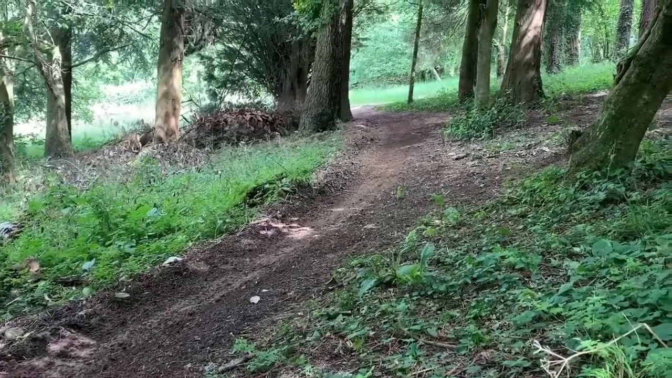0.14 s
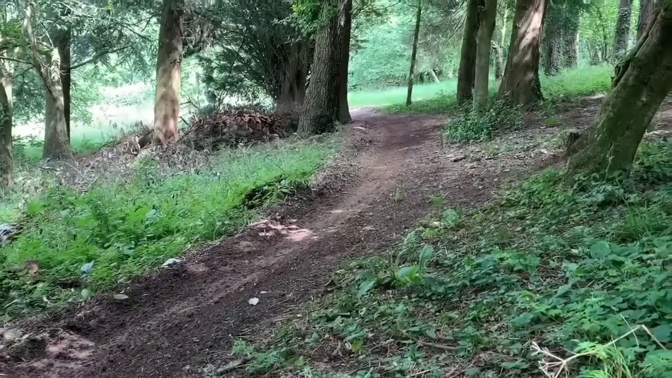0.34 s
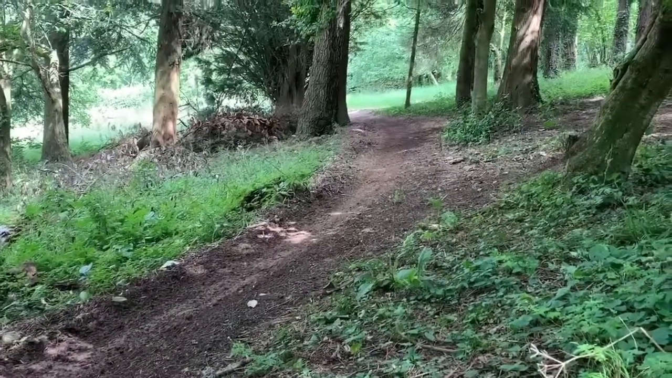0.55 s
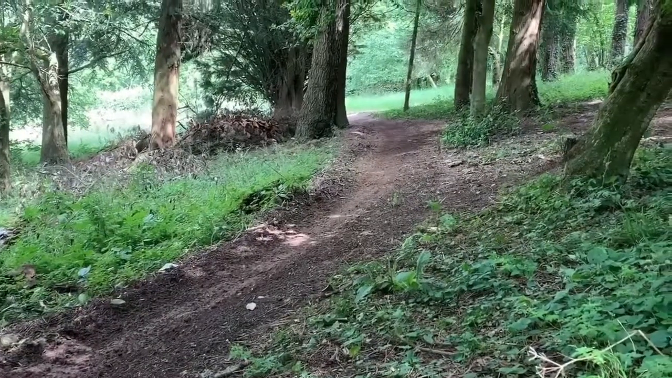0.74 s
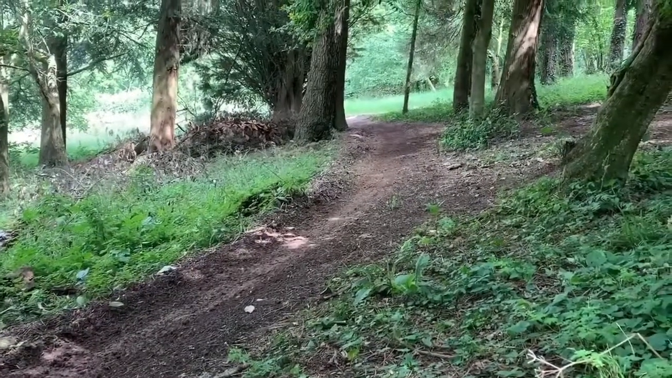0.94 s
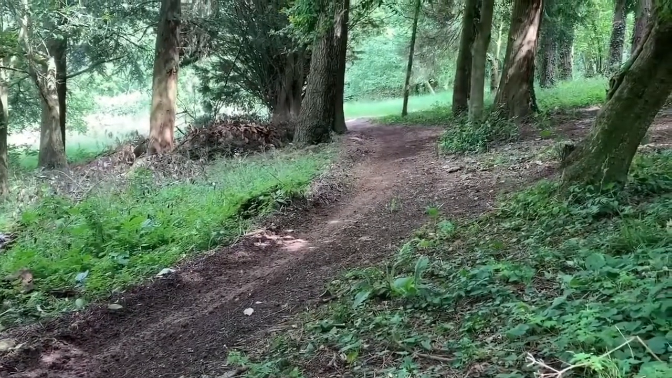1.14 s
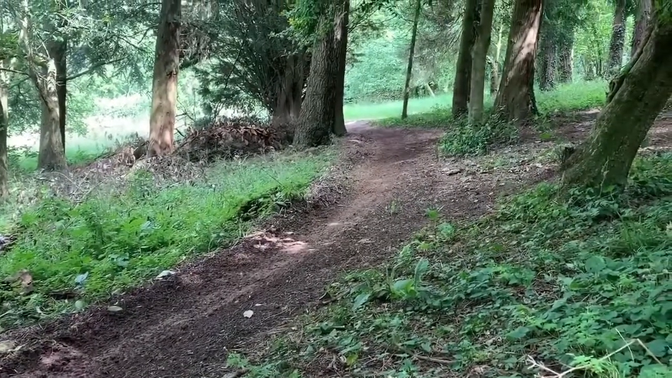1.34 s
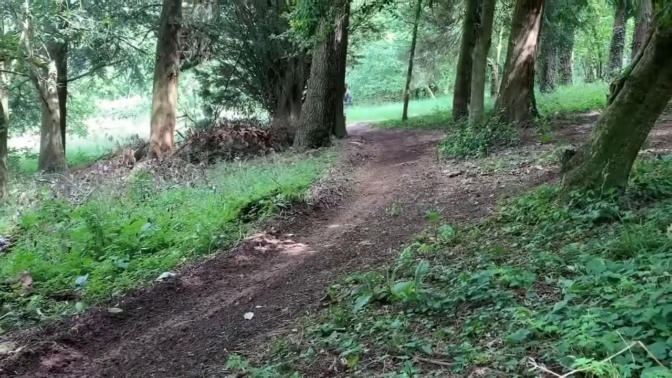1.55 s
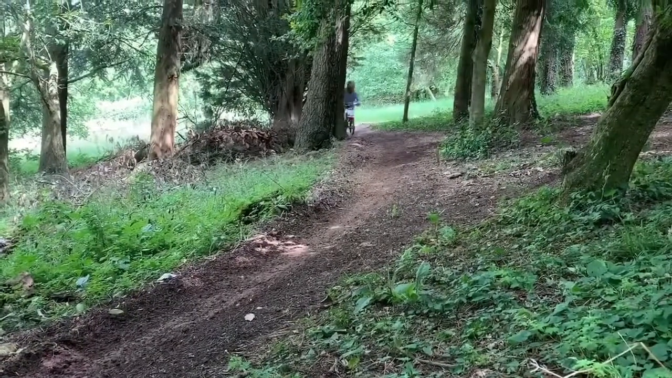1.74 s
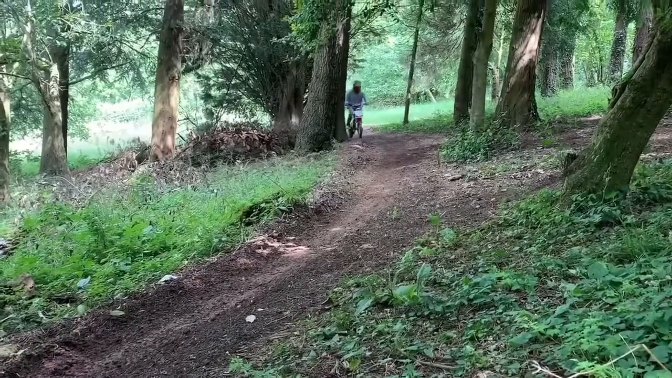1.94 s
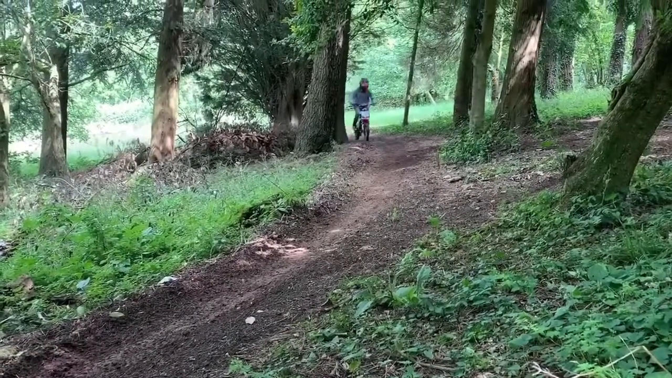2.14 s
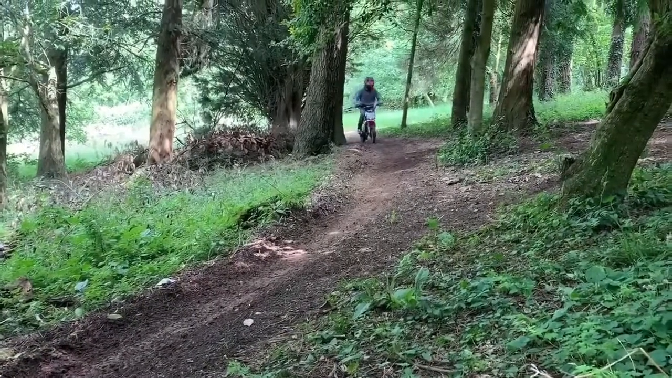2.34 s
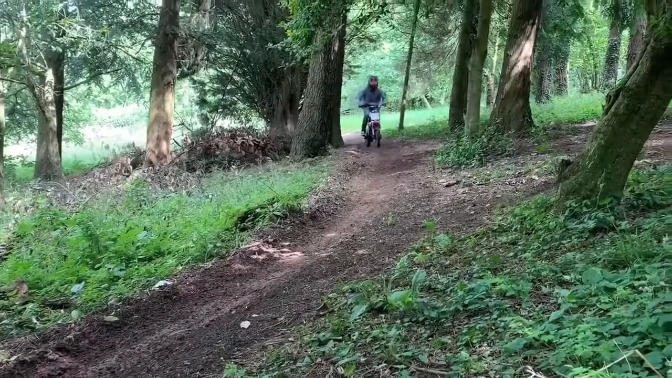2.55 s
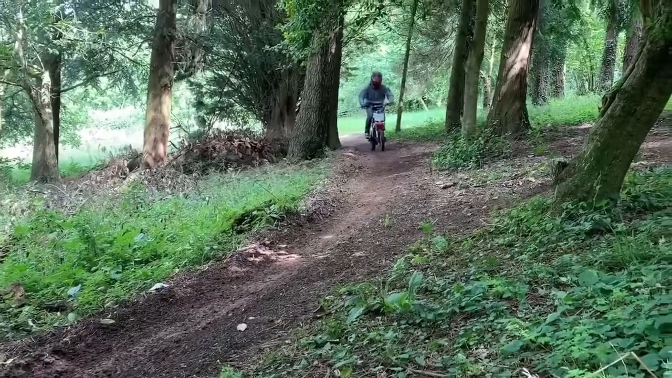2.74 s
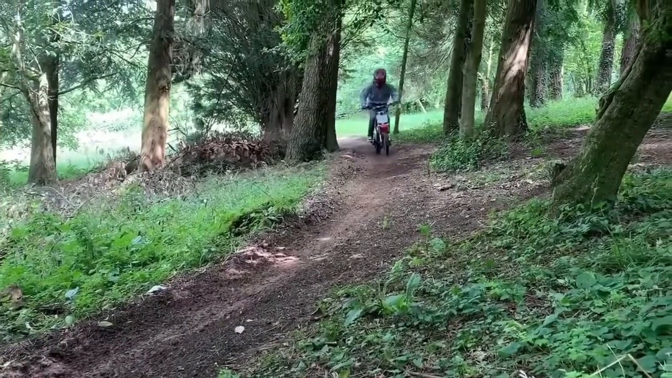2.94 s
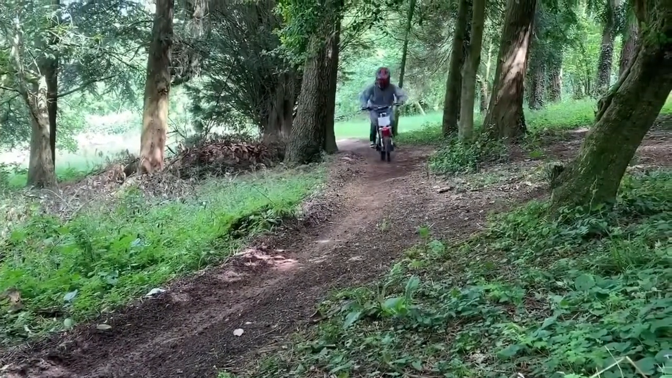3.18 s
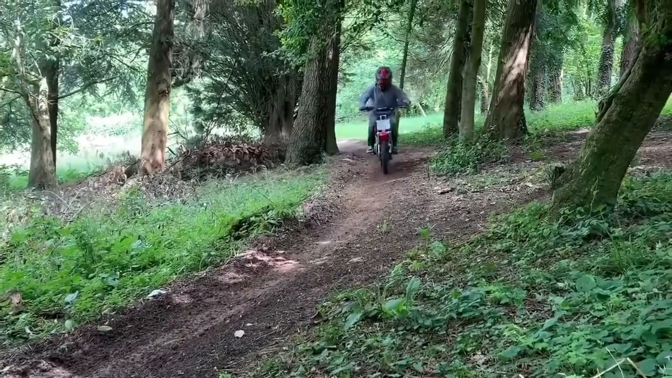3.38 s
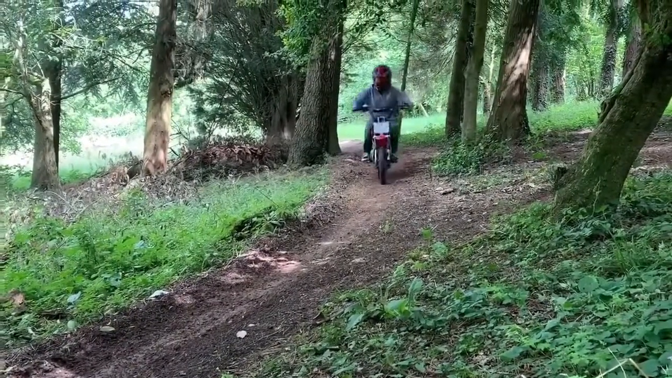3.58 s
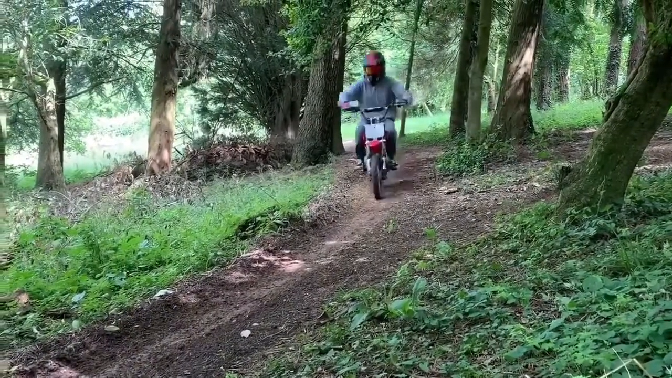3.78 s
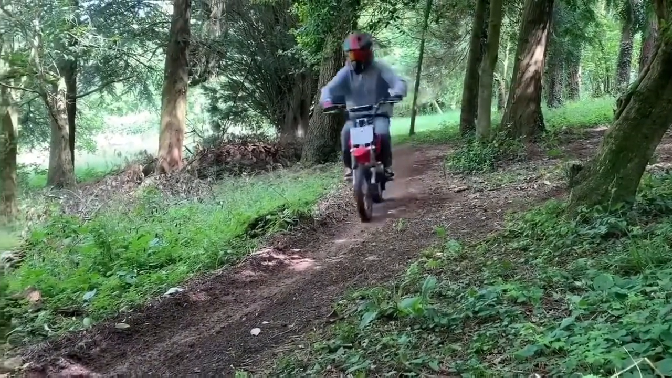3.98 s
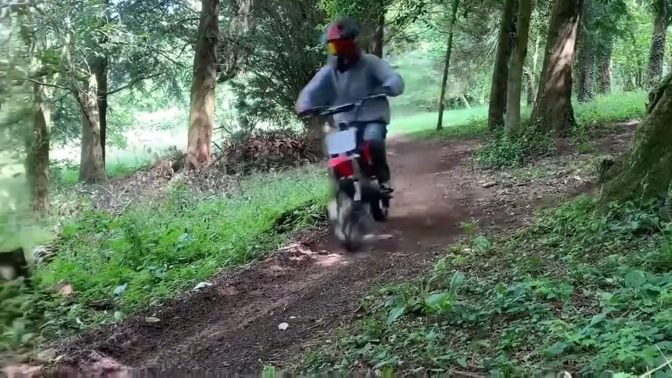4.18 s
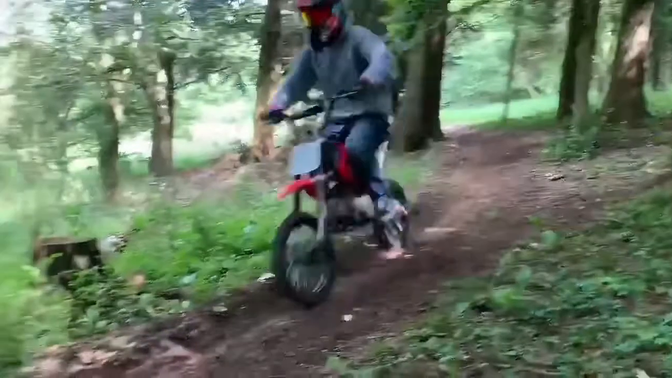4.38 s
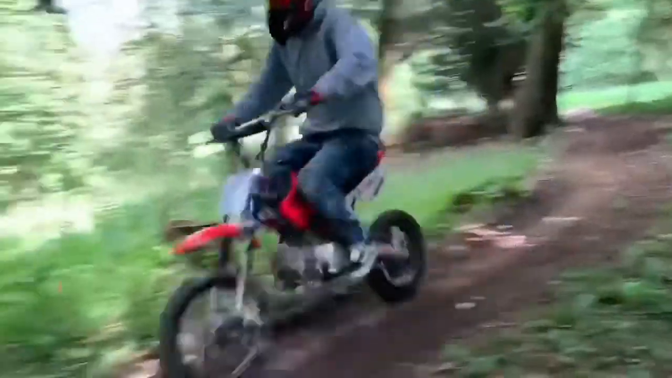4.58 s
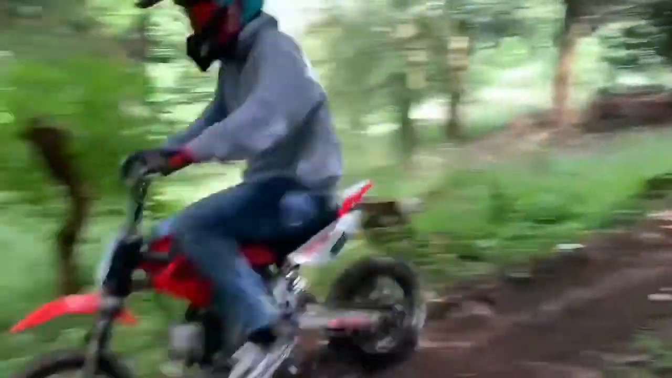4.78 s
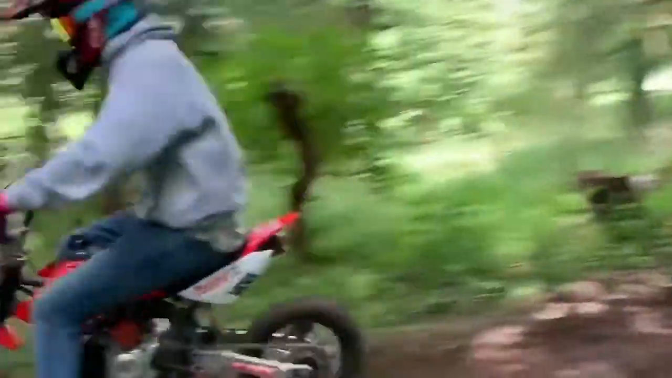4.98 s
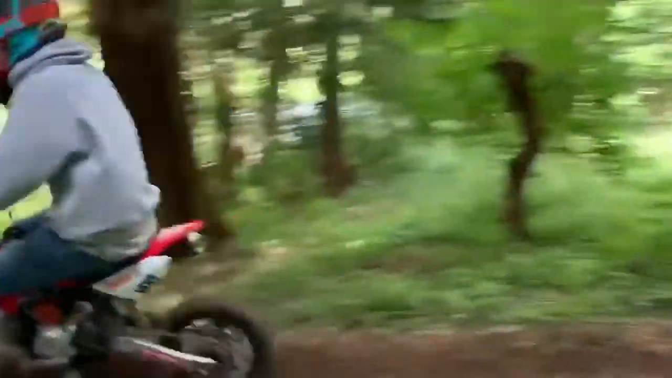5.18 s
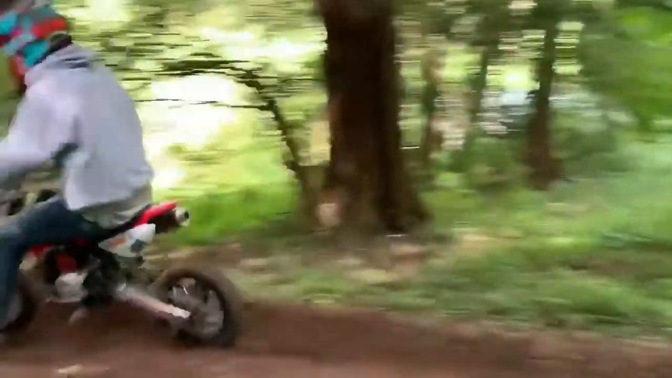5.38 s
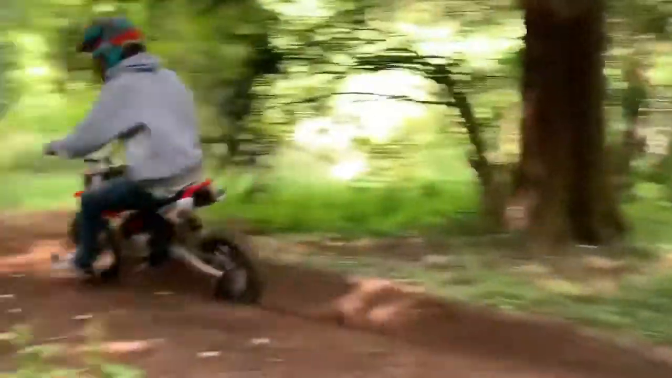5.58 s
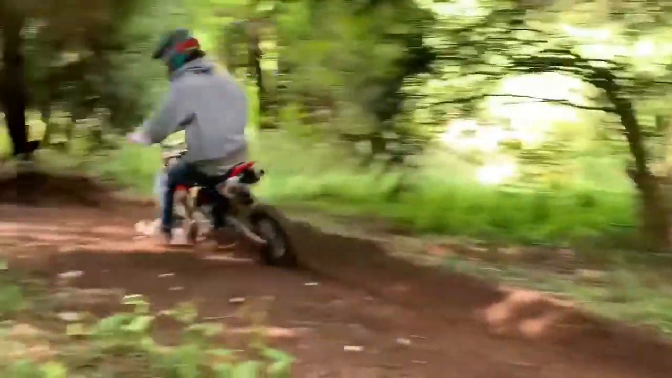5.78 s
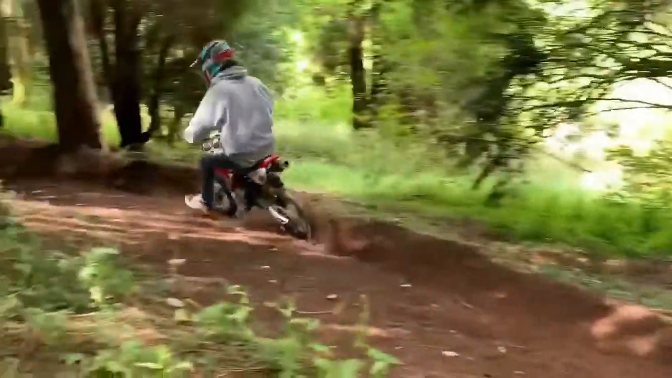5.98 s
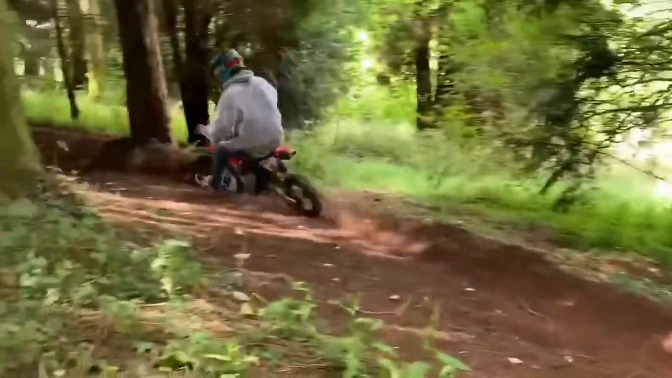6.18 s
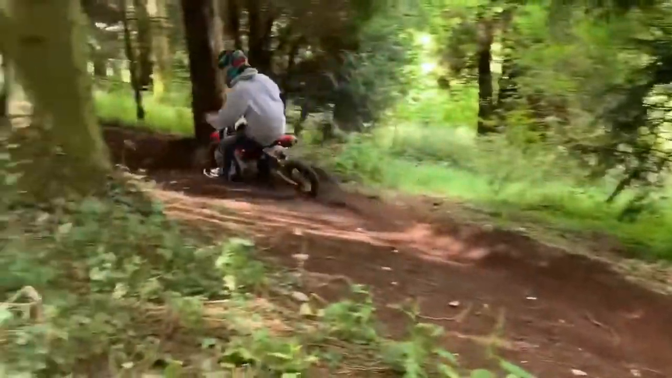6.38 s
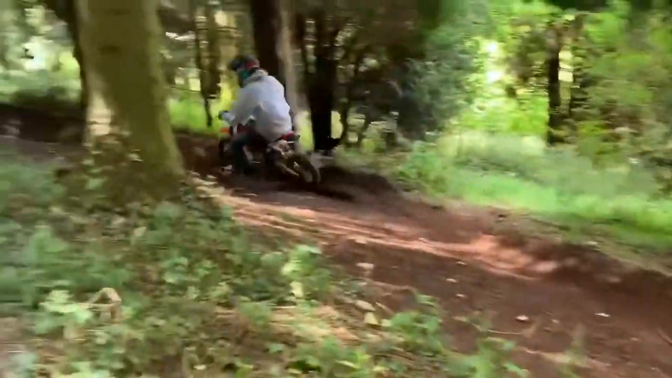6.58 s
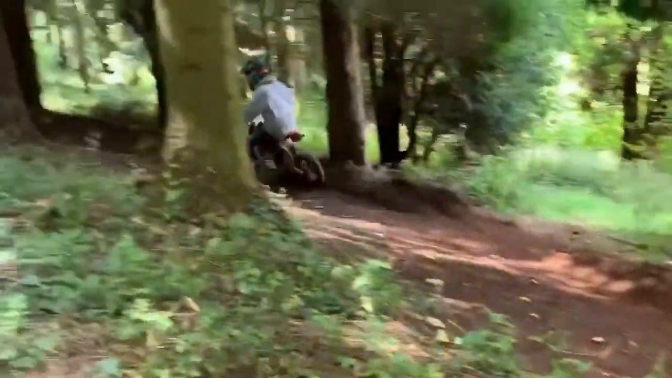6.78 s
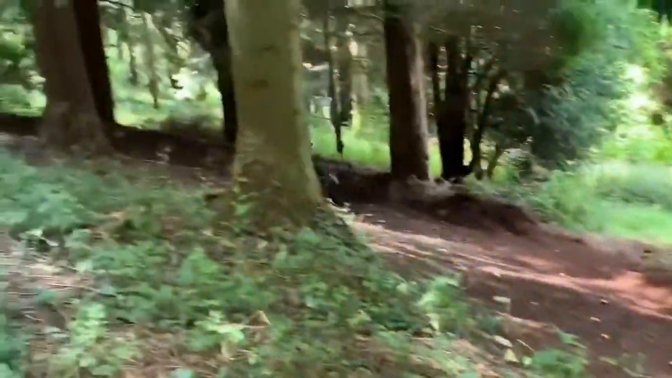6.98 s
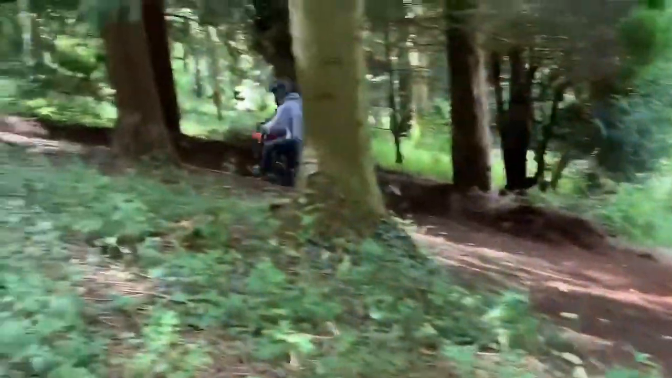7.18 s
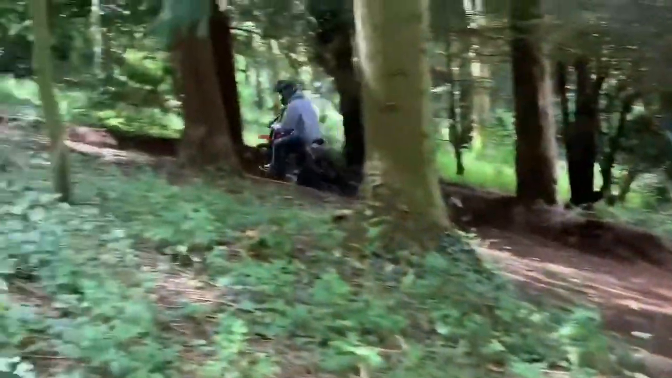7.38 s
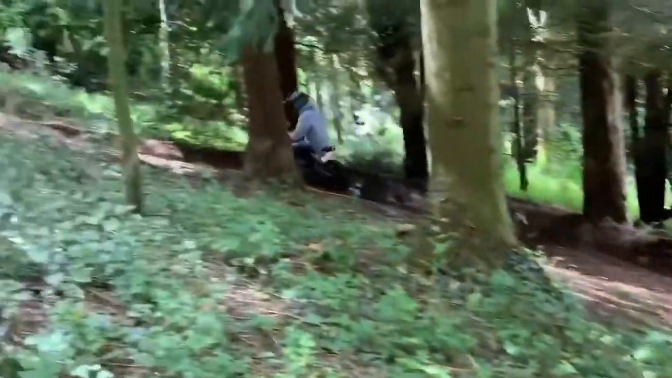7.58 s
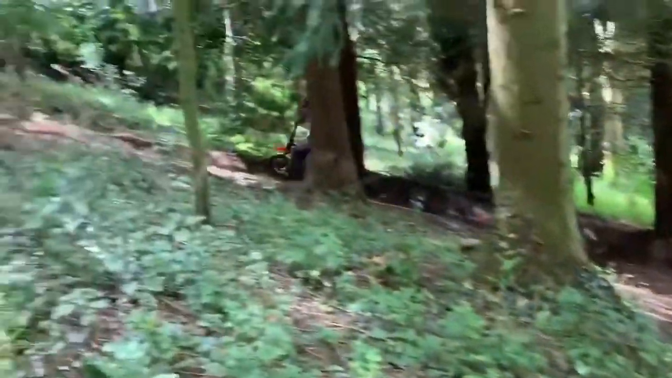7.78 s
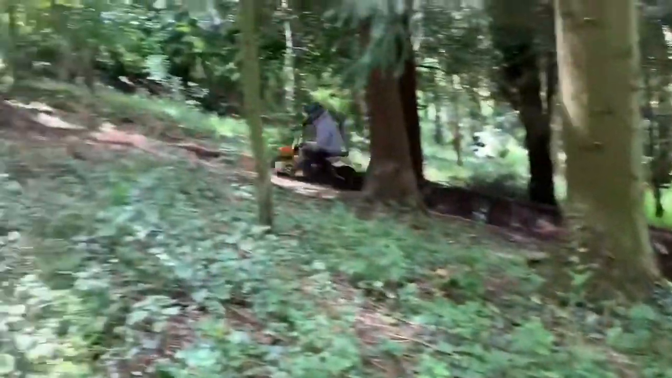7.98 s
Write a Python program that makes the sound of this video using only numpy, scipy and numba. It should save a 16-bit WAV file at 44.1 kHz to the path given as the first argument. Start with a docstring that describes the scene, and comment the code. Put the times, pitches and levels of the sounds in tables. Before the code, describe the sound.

A small four-stroke dirt bike thuds nearer down a woodland trail, coasts close past the microphone, blips its throttle and pulls away.

```python
"""A thudding, booming engine nears through woodland, coasts close past the microphone, blips and pulls away.
It is a small single-cylinder four-stroke dirt bike, from 50 m up the trail to 2 m at its nearest.
Each firing leaves the silencer as a short falling chirp, coloured into boom, thud, bark and crack.
Gas rasps and the airbox gulps once a cycle; valve gear rattles the cases; chain, tyres and grit hiss.
The trunks scatter the sound to both sides, and wind rumbles on the microphone."""
import sys
import numpy as np
from scipy import signal
from scipy.fft import rfft, irfft, next_fast_len
from scipy.io import wavfile
from scipy.ndimage import uniform_filter1d
from numba import njit

SR = 44100
rng = np.random.default_rng(int(sys.argv[2]) if len(sys.argv) > 2 else 0)


def master(y):
    """Save y as 16-bit WAV."""
    cut = np.clip(np.atleast_2d(y).T, -1, 1)
    pcm = np.round(cut * 32767)  # scale
    wavfile.write(sys.argv[1], SR, pcm.astype(np.int16))


N = 354123

# engine speed as heard at the microphone: (time [s], rate [firings/s])
FIRING_RATE = [(0.0, 45.8), (0.2, 46.4), (0.38, 51.5), (0.49, 50.8), (0.65, 54.1), (0.83, 53.9),
               (1.23, 57.4), (1.32, 59.0), (1.42, 60.4), (1.58, 60.0), (1.66, 62.8), (1.76, 61.5),
               (1.9, 65.0), (2.01, 61.8), (2.16, 61.0), (2.26, 62.5), (2.42, 61.0), (2.62, 61.7),
               (2.78, 61.8), (2.874, 63.4), (2.97, 64.9), (3.04, 64.4), (3.13, 66.5), (3.266, 66.1),
               (3.33, 70.2), (3.4, 68.9), (3.566, 67.6), (3.702, 61.0), (3.84, 56.4), (4.09, 54.2),
               (4.4, 47.3), (4.65, 45.4), (4.81, 46.6), (4.9, 41.4), (5.12, 36.3), (5.19, 34.9),
               (5.32, 42.1), (5.41, 39.6), (5.55, 35.2), (5.79, 33.1), (5.93, 43.7), (6.15, 46.2),
               (6.44, 48.8), (6.57, 43.2), (6.75, 46.5), (6.8, 46.0), (6.91, 44.2), (7.22, 47.6),
               (7.34, 49.7), (7.54, 46.8), (7.92, 52.2), (8.03, 51.6)]
# place of the bike on the trail: (time [s], distance from the microphone [m])
DISTANCE = [(0, 50.4), (1.35, 37), (2.3, 14.4), (3.35, 8.5), (4.1, 3.98), (4.55, 2.04), (4.87, 2.18),
            (5.15, 2.48), (5.65, 4.9), (6.35, 5.8), (6.9, 10.9), (8.03, 11.3)]
# how far the bike faces the microphone: (time [s], facing [0-1])
FACING = [(0, 0.22), (3.3, 0.52), (3.7, 0.87), (4.1, 1), (4.55, 0.03), (8.03, 0.04)]
# how directly the pipe points at the microphone once the bike has passed: (time [s], aim [0-1])
PIPE_AIM = [(4.9, 0.18), (5.25, 0.8), (6.45, 0.9), (7.05, 0.31)]
# twists of the throttle: (opens [s], shuts [s], first opening [0-1], last opening [0-1],
# accent on opening [dB], accent on shutting [dB])
THROTTLE_PULLS = [(-0.2, 1.9, .26, .27, 1, 0), (1.8, 2.9, .2, .33, -.5, 0), (2.79, 3.56, .4, .46, -2.5, -3),
                  (4.695, 4.805, .45, .42, -8, 4), (5.195, 5.335, .8, .56, 0, 4),
                  (5.775, 6.485, .52, .76, 3.5, 0), (6.45, 6.835, .48, .42, -6.5, 10),
                  (6.925, 7.48, .95, .9, 1.5, 0), (7.41, 8.16, .7, .68, -4, 0),
                  (7.69, 8.1, .85, .86, -.5, 0)]

# relative spectra of the exhaust's parts: (frequency [Hz], level [dB])
BOOM_SPECTRUM = [(48, -57), (60, 6.5), (70, 5.5), (90, 20), (120, 19), (145, 10.5), (180, -34), (300, -109)]
OVERRUN_THUD_SPECTRUM = [(90, -39), (135, 4), (165, 7), (200, 8.5), (235, 0.5), (280, -6.5), (350, -17.5),
                         (520, -72)]
BLOWN_THUD_SPECTRUM = [(110, -43), (175, -1), (230, 5.5), (275, 3.5), (320, -7.5), (370, -18.5),
                       (520, -48.5)]  # throttle open, pipe aimed at the microphone
BARK_SPECTRUM = [(200, -28), (320, -13), (390, 7.5), (440, 3.5), (500, 1), (590, -2), (720, -13),
                 (950, -23.5), (1300, -36), (2000, -83)]
CRACK_SPECTRUM = [(450, -24), (720, -0.5), (950, 3), (1200, -1), (1650, -4), (2500, -14.5), (4500, -37.5)]  # leads each firing under load
# bark heard from ahead, following the valve timing: (multiple of the firing rate, level [dB])
VALVE_ORDERS = [(5, -7), (6, -1), (7, 5), (8, -1.5), (9, -2), (10, -19), (11, -20), (12, -17.5), (13, -35),
                (14, -24.5)]
# tailpipe resonances on the overrun: (frequency [Hz], width [Hz], level [dB])
PIPE_MODES = [(592, 30, 0), (840, 54, -3), (1110, 55, 2), (1980, 90, -11), (2260, 60, -16)]
# the ring wavers in pitch, narrows, then jumps up and spreads into a broad clack:
# (time [s], pitch ratio, width ratio, level [dB])
RING_SWEEP = [(3.6, 1.17, 1.5, -46.5), (4.3, 0.97, 0.92, -42), (4.48, 1.01, 1, -29.5),
              (4.69, 0.97, 0.62, -24.5), (4.85, 1.1, 3.2, -25), (4.95, 0.75, 7.8, -29),
              (5.12, 0.92, 4.6, -38), (5.7, 1, 3.6, -49.5), (6.9, 0.86, 4, -55)]
# the narrow pipe mouth radiates no bass: (frequency [Hz], level [dB])
RING_SPECTRUM = [(300, -28.5), (550, 5), (1200, 3), (1400, -13.5), (2300, -7.5), (4000, -27)]
# on the way down the boom swells and sags, the thud does the opposite:
# (centre time [s], half length to 1/e [s], level [dB])
BOOM_SWELLS = [(0.534, 0.058, -2.5), (1.147, 0.3, -3), (1.734, 0.07, 3.5), (1.904, 0.046, -2),
               (2.116, 0.086, 5), (2.443, .04, 0), (2.566, 0.078, 3), (2.674, .03, -3), (2.764, 0.054, 4),
               (2.86, 0.035, -8), (2.942, .03, 4.5), (3.027, 0.044, -4), (3.126, .045, 4),
               (3.342, 0.032, -12), (3.445, 0.066, 4)]
# cooling fins and cases that the valve gear sets ringing: (frequency [Hz], width [Hz], level [dB])
CASE_MODES = [(1150, 90, -2), (1758, 110, 1.5), (2020, 70, -1), (2950, 140, -6.5), (3340, 57, -8),
              (3460, 54, -15), (3990, 100, -14), (4690, 80, -10.5)]

# relative spectra of the noises: (frequency [Hz], level [dB per Hz])
GAS_SPECTRUM = [(200, -1.5), (450, 12), (800, 0.5), (1250, 2), (1500, 1), (1800, 0.5), (2450, -3),
                (3200, -5), (3750, -5.5), (4200, -3.5), (4600, -9.5), (5100, -9.5), (5700, -16.5),
                (9000, -33)]
HISS_SPECTRUM = [(2000, -9), (4000, -3.5), (5200, -13), (6200, -8.5), (7400, -1.5), (8600, -13.5),
                 (9700, -1), (10900, -3.5), (12000, -70)]
WIND_SPECTRUM = [(15, -1), (30, 0), (50, -1), (80, -4), (150, -12), (300, -24), (800, -45)]
# sharp treble ticks and knocks, several of them on single firings:
# (time [s], starting level of the noise burst [dB])
KNOCKS = [(4.406, -29), (4.469, -25.5), (4.8646, -35), (4.974, -27), (5.236, -34), (5.2637, -30),
          (5.289, -28), (5.317, -24.5), (5.8409, -34), (6.1575, -33), (6.2215, -36)]
# thick trunks between bike and microphone: (from [s], until [s], midrange and treble loss [dB])
TRUNKS = [(6.526, 7.023, 4), (7.54, 7.72, 0.5)]
# wind on the microphone, before WIND_GAIN_DB and the gusts: (time [s], level [dB])
WIND_LEVEL = [(0.15, -56), (0.21, -51.5), (4.14, -36), (4.79, -37), (4.94, -48), (7.9, -34.5)]
# left port faces the trail, right port is shaded: (frequency [Hz], left minus right [dB])
PORT_DIFFERENCE = [(330, 0), (550, 2.5), (800, 10), (1100, 13), (2000, 8), (3600, 11), (5500, 10),
                   (7200, 0), (11000, 0)]

# loudness law of each part: (level at NEAR_M and CRUISE_HZ [dB], added by full throttle [dB],
# per doubling of distance [dB], added head-on [dB], per doubling of engine speed [dB])
BOOM_LAW = (-11.5, 5.5, -3, -5.5, 1.5)
OVERRUN_THUD_LAW = (-11.5, 3, -2.5, -2, 2.5)
PULL_THUD_LAW = (-10, 0.5, -5, -0.5, -1)
BARK_LAW = (-26.5, 14, -5, 11, 10)
CRACK_LAW = (-43, 21, -8, 5, 18.5)
RATTLE_LAW = (-41.5, -3, -4, 4.5, 15)
GAS_LAW = (-27, 6.5, -5, -3.5, 9)
INTAKE_LAW = (-43, 11, 0.7, -23, 30)
HISS_LAW = (-39, 5, -5, -1.5, 3.5)
SCATTER_LAW = (-14, 4, 2.7, -2, 16)  # from the trees, against the direct exhaust

NEAR_M, CRUISE_HZ = 2, 46  # reference distance [m] and firings per second
OPEN_S, SHUT_S = 0.059, 0.009  # throttle opening time, and decay time as it shuts
ACCENT_S, SHUT_ACCENT_S = 0.72, 0.11  # decay times of the accents on the thud
OVERRUN_OPENING = 0.063  # around and below this opening the wheel drives the engine
FIRING_LAG_CYCLES, OVERRUN_LAG_CYCLES = -0.03, 0.1126  # the overrun's suck comes later than the blow
INTAKE_LAG_CYCLES = -0.14
VALVE_AT_CYCLES, VALVE_LENGTH_CYCLES = 0.46, 0.12  # mid-cycle clatter of the valve gear
BLOW_CYCLES = 0.22  # decay of the blow of gas
UNEVEN_DB, CRACK_UNEVEN_DB = 1.37, 3  # spread of strength from firing to firing
MOST_SCATTER_DB, CRACK_SCATTER = 3, 0.88  # limit of the scatter; share of it that the crack gets
WAVER_DB = 0.57  # waver of the thud per doubling of distance
THUD_SEESAW = 0.54  # dB the thud loses for each dB of boom swell
OVERRUN_BARK_DB = -7  # bark with the throttle shut, from the side and behind
CRACK_AIM_DB = -5.5  # change of the crack when the pipe blows at the microphone
BROW_S, BROW_FADE_S, BROW_HZ = 1.59, 0.07, 4230  # time over the brow, fade constant, treble cutoff
TRUNK_EDGE_S, HISS_SHADE = 0.042, 1.8  # softness of a trunk's edge; hiss loses this multiple of the dB
KNOCK_S = 0.0053  # decay time of a tick or knock
WIND_GAIN_DB = 5.5
PORT_LAG_S, TOP_HZ = 0.000147, 11300  # right port's lag in the treble; top of the microphone's range


def exhaust(ride):
    """Chirped firings: a boom always, a thud that is higher when blown at the microphone, a bark, a crack."""
    overrun, facing, blown = ride["overrun"], ride["facing"], ride["blown"]
    cycles = ride["cycles"] - OVERRUN_LAG_CYCLES * overrun
    pulses = firings(cycles, UNEVEN_DB * (1 - overrun / 2), jitter_s=0.00004)
    sharp_pulses = firings(cycles, np.full(N, CRACK_UNEVEN_DB), jitter_s=0.00006)
    sources = np.array([pulses, valve_bark(cycles), sharp_pulses])
    direct_puffs, direct_valves, direct_cracks = silencer(sources, turns=1.542, corner_hz=25.85)

    swell_db = boom_swell_db()
    boom = steady(colour(direct_puffs, BOOM_SPECTRUM)) * loudness(BOOM_LAW, ride) * undb(swell_db)

    # everything but the boom and the pipe ring also arrives by way of the trees
    scatter = np.minimum(loudness(SCATTER_LAW, ride), undb(MOST_SCATTER_DB))
    puffs = direct_puffs + scatter * trees(direct_puffs, t60_s=0.95)
    valves = direct_valves + scatter * trees(direct_valves, t60_s=0.95)
    cracks = direct_cracks + CRACK_SCATTER * scatter * trees(direct_cracks, t60_s=0.95)

    overrun_thud = colour(puffs, OVERRUN_THUD_SPECTRUM)
    blown_thud = colour(puffs, BLOWN_THUD_SPECTRUM)
    thud = steady((1 - blown) * overrun_thud + blown * blown_thud)
    thud = thud * undb(WAVER_DB * ride["far"] * walk(12) - THUD_SEESAW * swell_db)
    # the cylinder blows under load and sucks on the overrun; in between the two cancel
    blow = (1 - overrun) * loudness(PULL_THUD_LAW, ride) * undb(ride["accent_db"])
    suck = overrun * loudness(OVERRUN_THUD_LAW, ride) * undb(ride["shut_db"])
    thud = thud * np.abs(blow - suck)

    bark = steady((1 - facing) * colour(puffs, BARK_SPECTRUM) + facing * steady(valves))
    bark = bark * loudness(BARK_LAW, ride) * undb(OVERRUN_BARK_DB * overrun * (1 - facing))
    crack = steady(colour(cracks, CRACK_SPECTRUM), size=6000) * loudness(CRACK_LAW, ride)
    crack = crack * undb(CRACK_AIM_DB * blown) * (1 - overrun)
    ring = overrun * pipe_ring(direct_puffs)
    return boom + thud + (bark + crack + ring) * ride["shade"]


def firings(cycles, scatter_db, jitter_s):
    """One pulse each engine cycle, each a little off in time and strength."""
    at = np.interp(np.arange(1, int(cycles[-1])), cycles, np.arange(N))
    chance = rng.standard_normal((len(at), 2))
    at = np.clip(at + jitter_s * SR * chance[:, 0], 0, N - 2)
    i = at.astype(int)
    size = undb(scatter_db[i] * chance[:, 1])
    # a pulse between two samples is shared by both
    return np.bincount(i, size * (1 - at + i), N) + np.bincount(i + 1, size * (at - i), N)


def silencer(pulses, turns, corner_hz):
    """The chambers hold each frequency back for a few of its own cycles: a pulse becomes a falling chirp."""
    return shape(pulses, lambda hz: np.exp(-2j * np.pi * turns * np.log(1 + hz / corner_hz)))


def valve_bark(cycles):
    """The valves open for a fixed crank angle, so this band of harmonics slides with the engine speed."""
    angle = (2 * np.pi * ((cycles + 0.006 * walk(30)) % 1)).astype(np.float32)
    return sum(undb(db + 1.3 * walk(9)) * np.cos(round(order) * angle) for order, db in VALVE_ORDERS)


def boom_swell_db():
    """Rise and fall of the boom on the way down the trail, as a sum of smooth humps in dB."""
    t = np.arange(N) / SR
    return sum(db * np.exp(-((t - s) / length) ** 2) for s, length, db in BOOM_SWELLS)


def pipe_ring(puffs):
    """Each puff rings the tailpipe; the ring wavers, narrows, then jumps up and spreads into a broad clack."""
    pitch, spread, db = curves(RING_SWEEP)
    spread = np.maximum(spread, 0.5)
    ring = sum(undb(mode_db) * sweep(puffs, hz * pitch, width * spread) for hz, width, mode_db in PIPE_MODES)
    return steady(colour(ring, RING_SPECTRUM)) * undb(db)


@njit
def sweep(x, hz, width):
    """A resonance (state-variable filter) whose centre and width move; gain 1 at the centre."""
    y, band, low = np.empty(len(x)), 0., 0.
    for i in range(len(x)):
        g, damping = np.tan(np.pi * hz[i] / SR), width[i] / hz[i]
        v = (band + g * (x[i] + 1e-18 - low)) / (1 + g * (g + damping))
        band = 2 * v - band
        low = low + 2 * g * v
        y[i] = damping * v
    return y


def rattle(ride):
    """The valves snap shut twice a cycle and ring the fins and cases, best heard from ahead."""
    uneven_db = np.full(N, UNEVEN_DB)
    taps = sum(firings(ride["cycles"] - at, uneven_db, jitter_s=0.0004) for at in (0, VALVE_AT_CYCLES))
    ringing = resonate(taps, CASE_MODES)
    ringing = steady(ringing + trees(ringing, t60_s=0.48), size=6000)
    return ringing * loudness(RATTLE_LAW, ride) * ride["shade"]


def gas(ride):
    """Turbulent gas and valve gear rasp, swelling around each firing, more sharply behind the open pipe."""
    blown = ride["blown"]
    gate = strokes(ride, blow=0.69 + 0.57 * blown, clatter=0.13) / (1 + 0.25 * blown)
    noise = rng.standard_normal((2, N)) + 1.06 * rng.standard_normal(N)  # partly alike at both ports
    rasp = colour(gate * noise, GAS_SPECTRUM)
    # the brow of the hill hides the treble until the bike comes over it
    hidden = shape(rasp, lambda hz: 1 / np.sqrt(1 + (hz / BROW_HZ) ** 4))
    rasp = hidden + ride["in_sight"] * (rasp - hidden)
    return rasp * loudness(GAS_LAW, ride) * ride["shade"] * undb(1.1 * walk(25))


def strokes(ride, blow, clatter):
    """Noise swells twice a cycle: a sharp blow at the firing, then the valve gear."""
    phase = ride["cycles"] % 1
    valve_swell = np.exp(-((phase - VALVE_AT_CYCLES) / VALVE_LENGTH_CYCLES) ** 2)
    return 1 + blow * np.exp(-phase / BLOW_CYCLES) + clatter * valve_swell


def intake(ride):
    """The airbox gulps once a cycle, a little unsteadily: a sine at the firing rate."""
    gulps = np.sqrt(2) * np.sin(2 * np.pi * (ride["cycles"] - INTAKE_LAG_CYCLES))
    return gulps * loudness(INTAKE_LAW, ride) * undb(walk(5.6))


def running_gear(ride):
    """Chain and tyres hiss and grit crackles under the knobs, with a few sharp treble ticks and knocks."""
    grit = (rng.random(N) < 200 / SR) * rng.standard_normal(N)  # about 200 grains a second
    grit = grit * undb(0.63 * np.minimum(rng.exponential(size=N), 4))
    noise = rng.standard_normal((2, N)) + 0.51 * rng.standard_normal(N)
    load = ride["opening"] * (1 - ride["facing"])
    noise = noise * strokes(ride, blow=1.3 * load, clatter=1.3 * load) / (1 + load / 2)
    hiss = colour(noise + 6 * grit, HISS_SPECTRUM) * loudness(HISS_LAW, ride) * undb(2.0 * walk(35))
    hiss = hiss * ride["in_sight"] * ride["shade"] ** HISS_SHADE
    strikes = np.zeros(N)
    for s, start_db in KNOCKS:
        strikes[int(s * SR)] += undb(start_db)
    decay = signal.lfilter([1], [1, -np.exp(-1 / (KNOCK_S * SR))], strikes)
    return hiss + decay * colour(rng.standard_normal((2, N)), HISS_SPECTRUM)


def trees(x, t60_s):
    """Scatter from trunks and leaves, different on each side, with little bass: a decaying noise tail."""
    t = np.arange(SR // 2) / SR
    tail = rng.standard_normal((2, len(t))) * undb(-60 * t / t60_s) * (1 - np.exp(-t / 0.012))
    tail /= np.sqrt(np.sum(tail ** 2, axis=1, keepdims=True))
    mid, side = signal.oaconvolve(x[None], tail, axes=1)[:, :N]
    # long waves reach both ports alike
    side = shape(side, lambda hz: gain_at(hz, [(150, -38), (350, -20), (700, -8)]))
    both = mid + side * np.array([[1], [-1]])
    return shape(both, lambda hz: gain_at(hz, [(100, -9), (250, -4), (450, 0)]))


def wind():
    """Air buffets the microphone with a soft rumble, nearly alike at both ports."""
    db, = curves(WIND_LEVEL)
    eddies = rng.standard_normal(N) + 0.07 * rng.standard_normal((2, N))
    gusts_db = 2.5 * walk(6)
    return colour(eddies, WIND_SPECTRUM) * undb(db + WIND_GAIN_DB + gusts_db)


def riding():
    """The state of the bike that all its parts follow, one value a sample."""
    (rate_hz,), (facing,), (aim,) = curves(FIRING_RATE), curves(FACING), curves(PIPE_AIM)
    far, = curves([(s, np.log2(m / NEAR_M)) for s, m in DISTANCE])  # doublings of distance
    opening, accent_db, shut_db = throttle()
    overrun = np.exp(-opening / OVERRUN_OPENING)
    in_sight = 1 / (1 + np.exp((BROW_S - np.arange(N) / SR) / BROW_FADE_S))
    return dict(cycles=np.cumsum(rate_hz) / SR - FIRING_LAG_CYCLES,
                revs=np.log2(rate_hz / CRUISE_HZ), far=far, facing=np.clip(facing, 0, 1),
                opening=opening, accent_db=accent_db, shut_db=shut_db, overrun=overrun,
                blown=np.clip(aim, 0, 1) * (1 - overrun), shade=trunk_shade(), in_sight=in_sight)


def throttle():
    """Opening of the throttle, and the accents that opening and shutting it put on the next thuds."""
    t = np.arange(N) / SR
    opening, accent_db, shut_db = np.zeros((3, N))
    for start, end, first, last, on_db, off_db in THROTTLE_PULLS:
        since_open, since_shut = np.maximum(t - start, 0), np.maximum(t - end, 0)
        twist = np.interp(t, [start, end], [first, last]) * np.minimum(since_open / OPEN_S, 1) ** 2
        opening = np.maximum(opening, twist * np.exp(-since_shut / SHUT_S))
        accent_db = np.where(t < start, accent_db, on_db * np.exp(-since_open / ACCENT_S))
        shut_db = np.where(t < end, shut_db, off_db * np.exp(-since_shut / SHUT_ACCENT_S))
    return opening, *uniform_filter1d(np.array([accent_db, shut_db]), size=2000)


def trunk_shade():
    """Gain of the midrange and treble as the bike goes behind the trunks."""
    t = np.arange(N) / SR
    shade_db = np.zeros(N)
    for start, end, loss_db in TRUNKS:
        behind = (np.tanh((t - start) / TRUNK_EDGE_S) - np.tanh((t - end) / TRUNK_EDGE_S)) / 2
        shade_db -= loss_db * behind
    return undb(shade_db)


def loudness(law, ride):
    """Gain of one part from throttle, distance, heading and engine speed."""
    base, pull, far, facing, revs = law
    db = base + pull * ride["opening"] + far * ride["far"]
    return undb(db + facing * ride["facing"] + revs * ride["revs"])


def undb(db):
    """Decibels to gain."""
    return np.exp(np.asarray(db) * (np.log(10) / 20))


def curves(table):
    """The columns of a timed table, one value a sample."""
    s, *columns = np.transpose(table)
    return [np.interp(np.arange(N) / SR, s, c) for c in columns]


def gain_at(hz, points):
    """Gain of a (frequency [Hz], level [dB]) spectrum at these frequencies."""
    f, db = np.transpose(points)
    return undb(np.interp(np.log(hz + 1), np.log(f), db))


def shape(x, response):
    """Filter by a response given as a function of frequency."""
    size = next_fast_len(N + SR // 2)
    return irfft(rfft(x, size) * response(np.fft.rfftfreq(size, 1 / SR)), size)[..., :N]


def resonate(x, modes):
    """Ring a set of (frequency [Hz], width [Hz], level [dB]) resonances."""
    def response(hz):
        return sum(undb(db) * 1j * hz * w / (f ** 2 - hz ** 2 + 1j * hz * w) for f, w, db in modes)
    return shape(x, response)


def colour(x, points):
    """Give a sound a spectrum and unit rms."""
    y = shape(x, lambda hz: gain_at(hz, points))
    return y / np.std(y)


def steady(x, size=3000):
    """Unit rms over every few firings, whatever the engine speed."""
    power = np.mean(np.atleast_2d(x) ** 2, axis=0)
    power = uniform_filter1d(uniform_filter1d(power, size), size)
    return x / np.sqrt(power + 1e-9)


def walk(rate):
    """Random levels held 1 / rate seconds and slewed twice, with a spread of 1."""
    k = int(SR / rate)
    steps = np.repeat(rng.standard_normal(N // k + 1), k)
    y = uniform_filter1d(uniform_filter1d(steps, k), k)[:N]
    return y / np.std(y)


def scene():
    """All parts of the engine turn with one crankshaft and follow one throttle."""
    ride = riding()
    return exhaust(ride) + rattle(ride) + gas(ride) + intake(ride) + running_gear(ride) + wind()


def record(dry):
    """The microphone hears the midrange earlier and louder on the left, rounds loud peaks and cuts the top."""
    left = shape(dry[0], lambda hz: 2 / (1 + 1 / gain_at(hz, PORT_DIFFERENCE)))

    def right_port(hz):
        lag_s = PORT_LAG_S * hz / (hz + 90)  # the lag shrinks towards the bass
        return 2 / (1 + gain_at(hz, PORT_DIFFERENCE)) * np.exp(-2j * np.pi * hz * lag_s)

    both = np.array([left, shape(dry[1], right_port)])
    rounded = both / (1 + both ** 8) ** (1 / 8)
    return signal.sosfilt(signal.ellip(10, 0.2, 80, TOP_HZ, fs=SR, output="sos"), rounded)


dry = scene()
out = record(dry)
master(out)
```